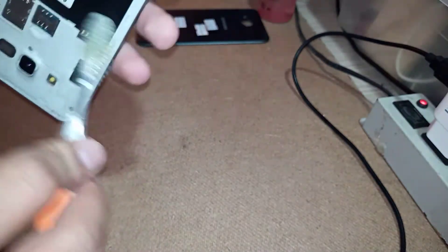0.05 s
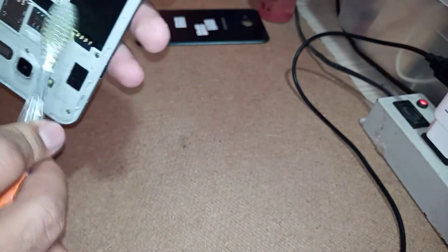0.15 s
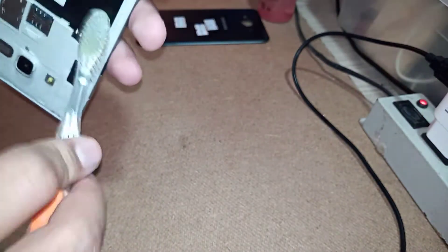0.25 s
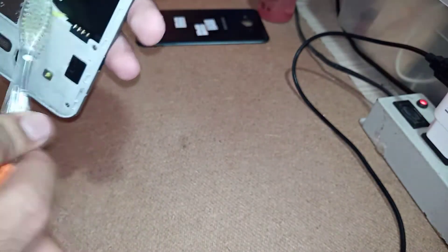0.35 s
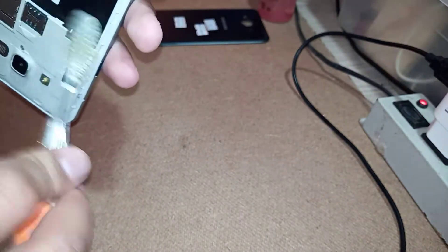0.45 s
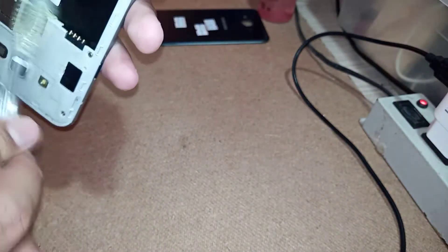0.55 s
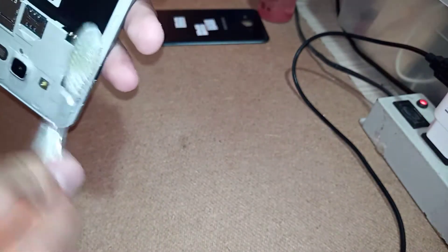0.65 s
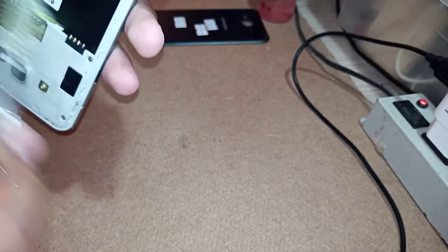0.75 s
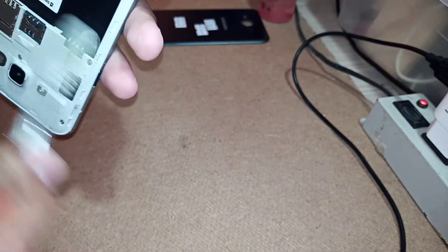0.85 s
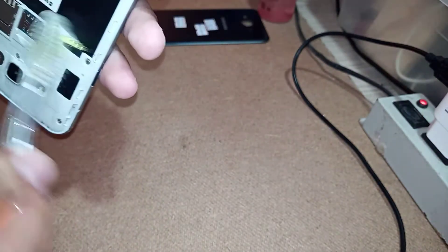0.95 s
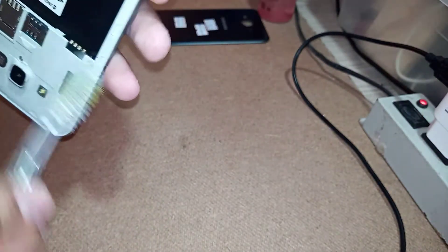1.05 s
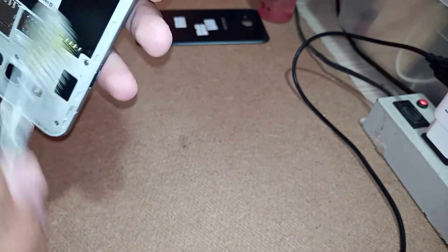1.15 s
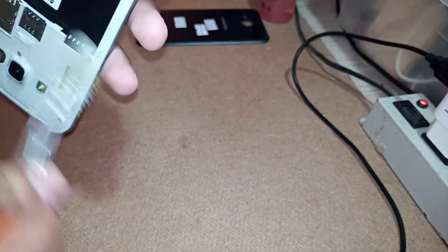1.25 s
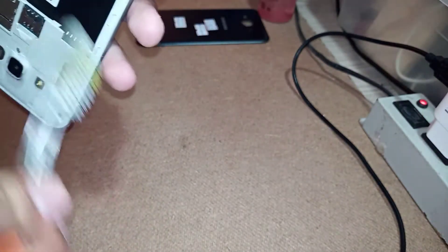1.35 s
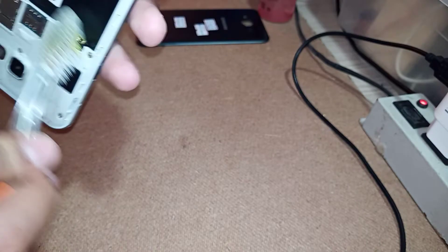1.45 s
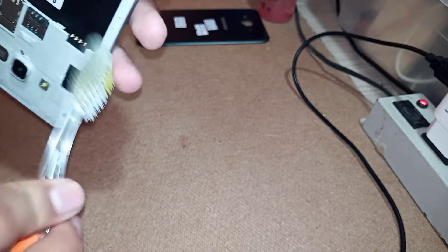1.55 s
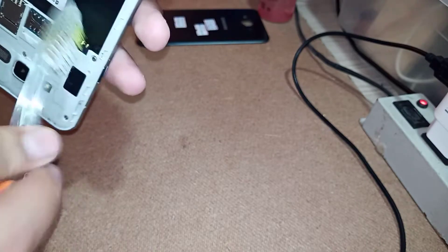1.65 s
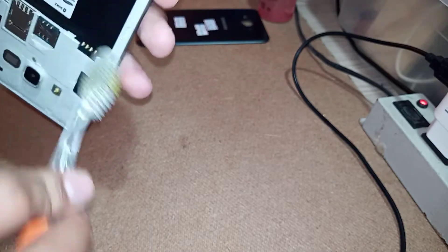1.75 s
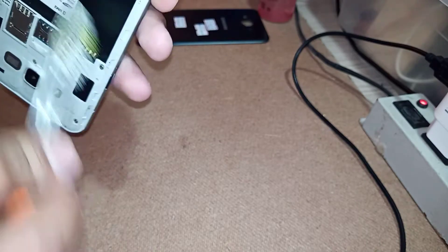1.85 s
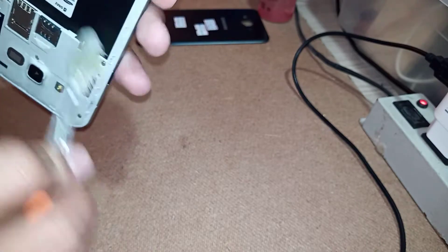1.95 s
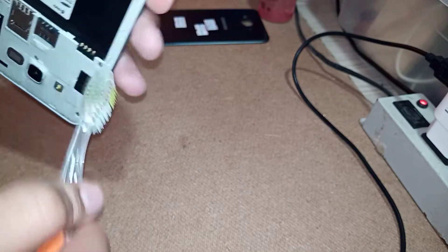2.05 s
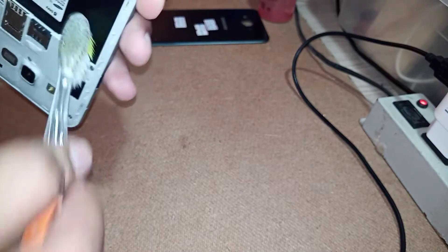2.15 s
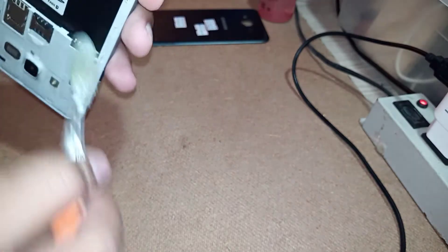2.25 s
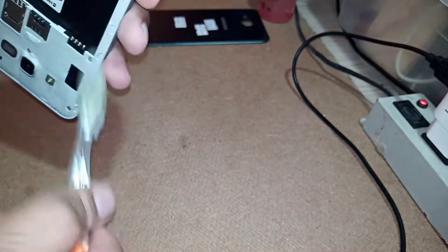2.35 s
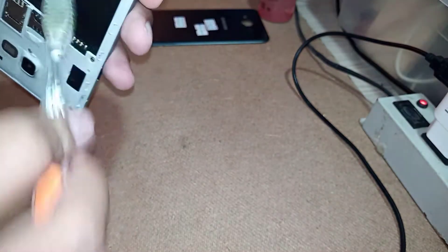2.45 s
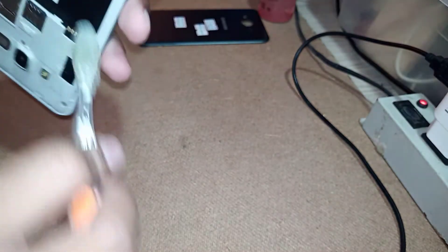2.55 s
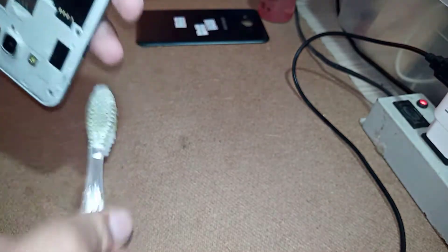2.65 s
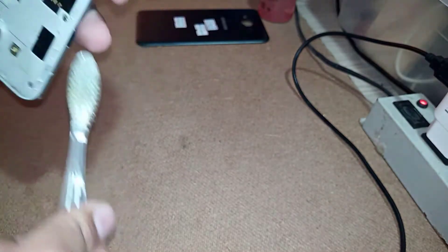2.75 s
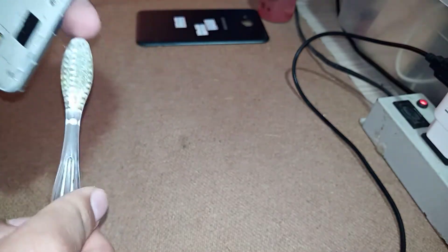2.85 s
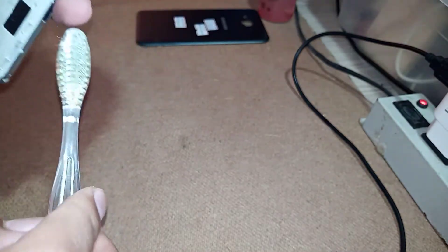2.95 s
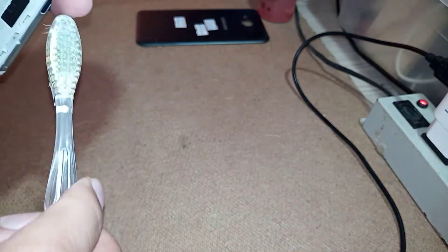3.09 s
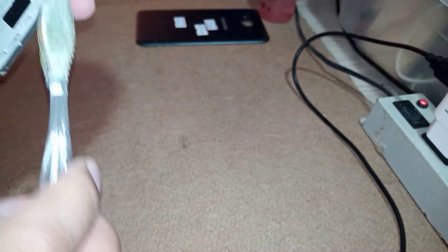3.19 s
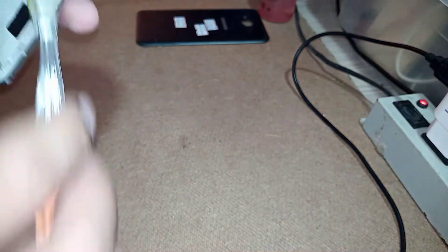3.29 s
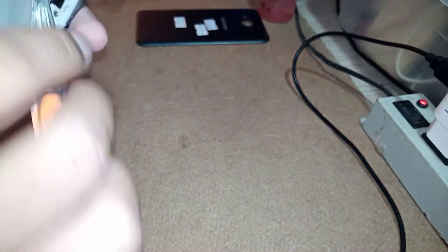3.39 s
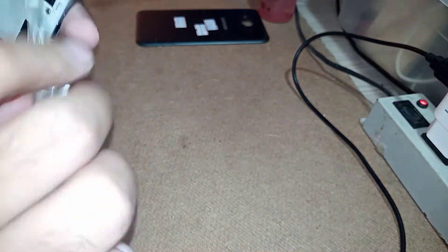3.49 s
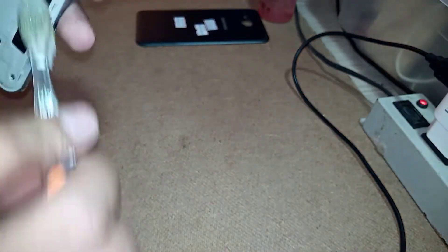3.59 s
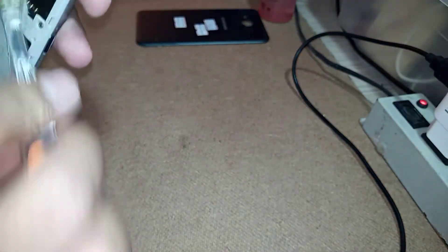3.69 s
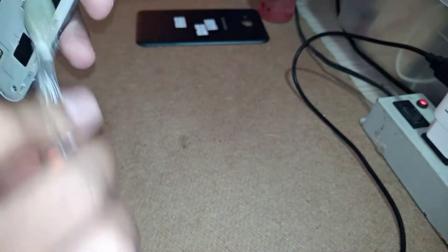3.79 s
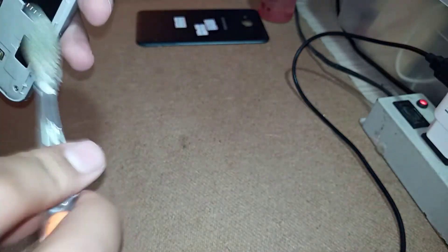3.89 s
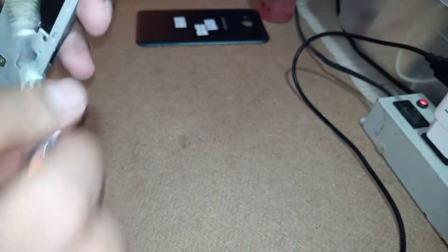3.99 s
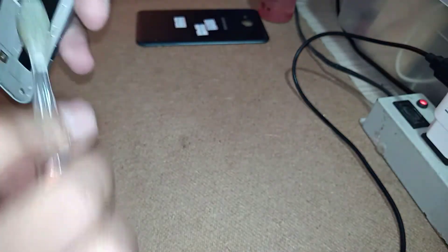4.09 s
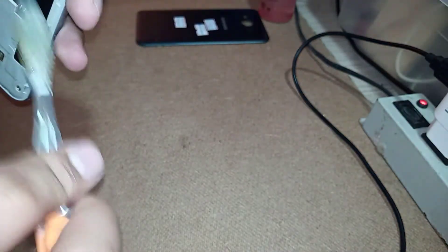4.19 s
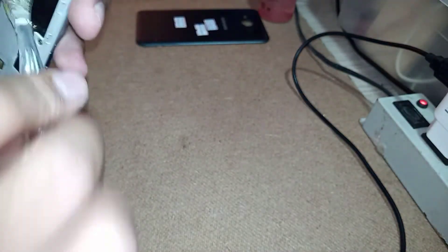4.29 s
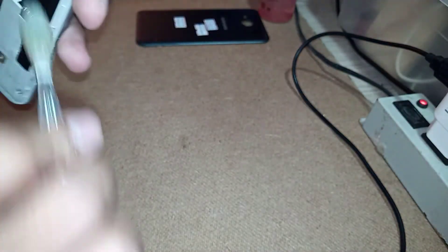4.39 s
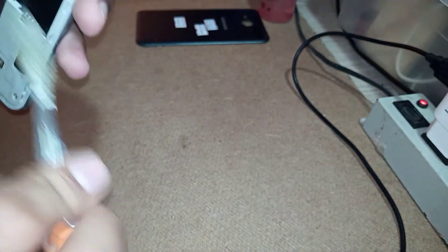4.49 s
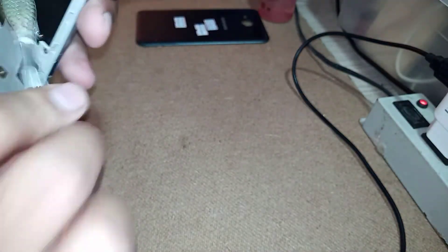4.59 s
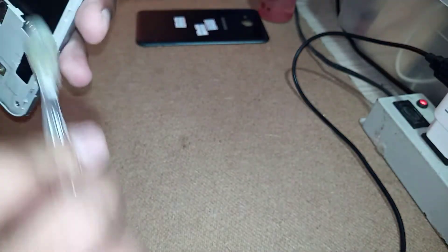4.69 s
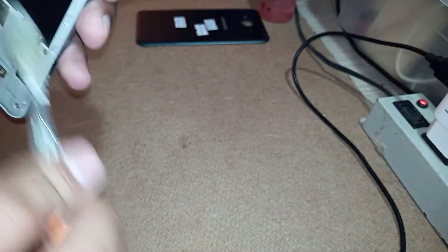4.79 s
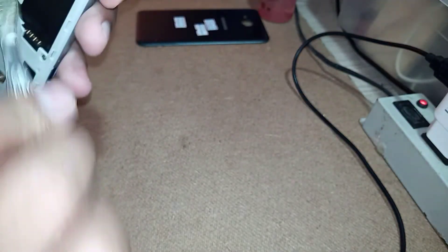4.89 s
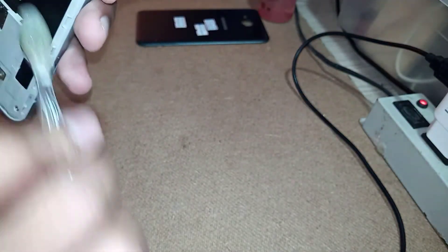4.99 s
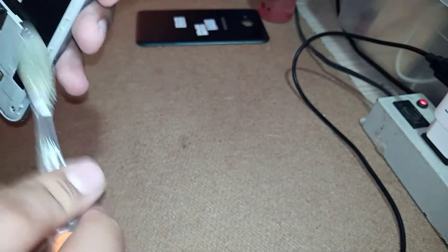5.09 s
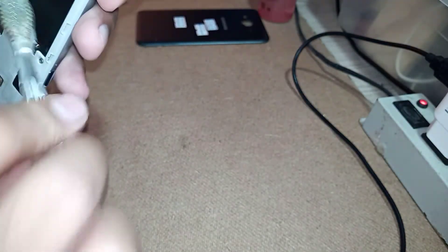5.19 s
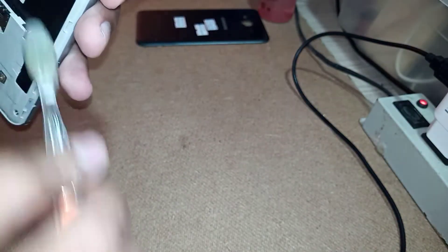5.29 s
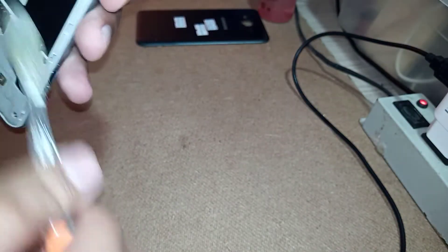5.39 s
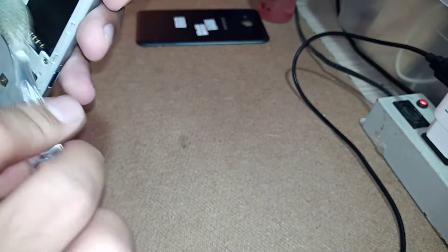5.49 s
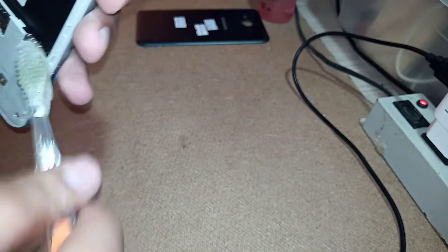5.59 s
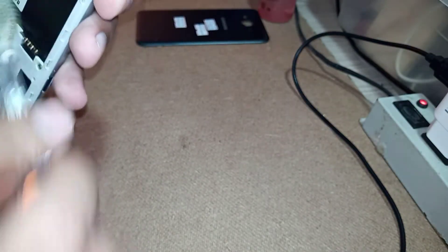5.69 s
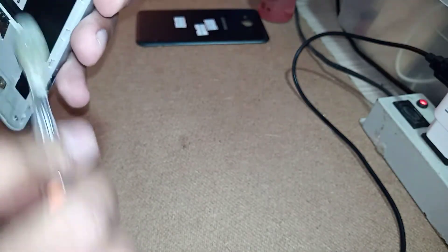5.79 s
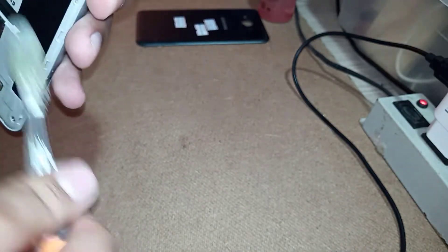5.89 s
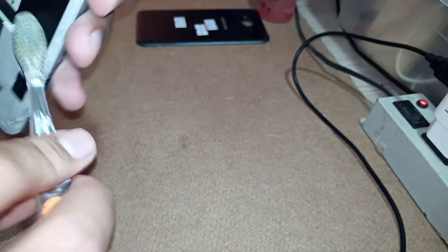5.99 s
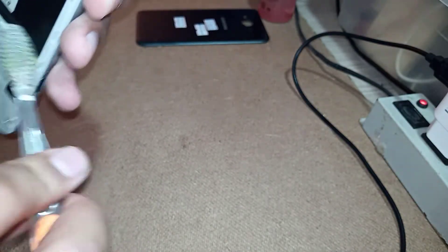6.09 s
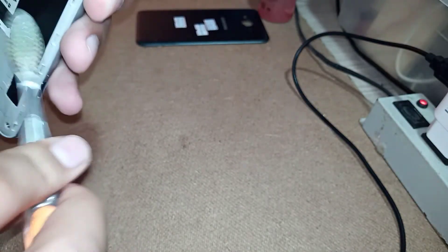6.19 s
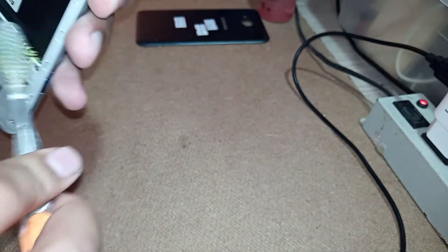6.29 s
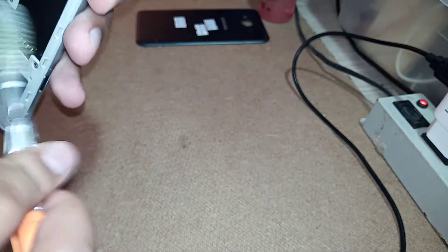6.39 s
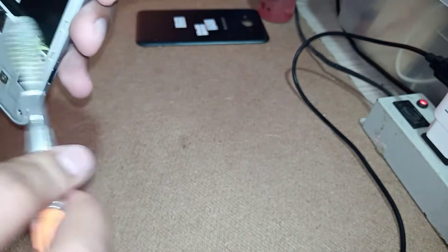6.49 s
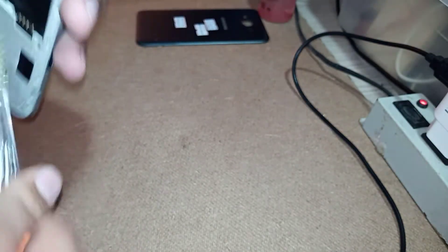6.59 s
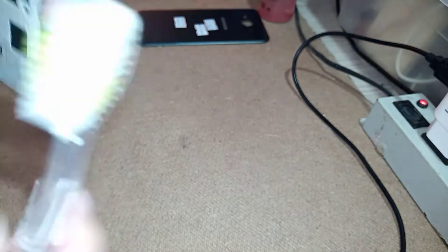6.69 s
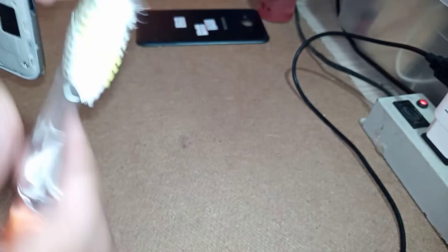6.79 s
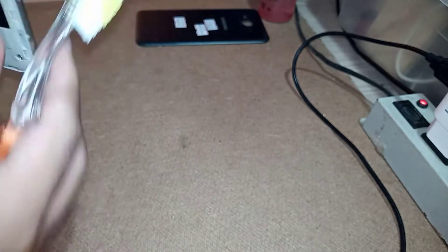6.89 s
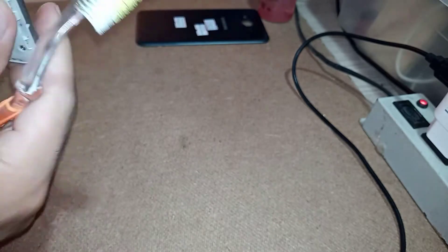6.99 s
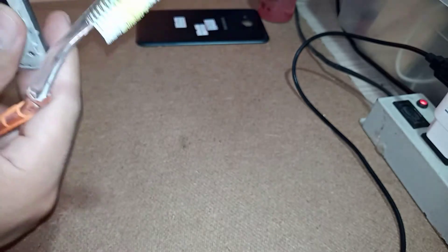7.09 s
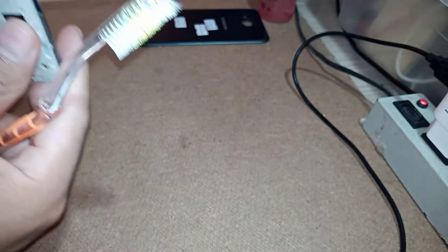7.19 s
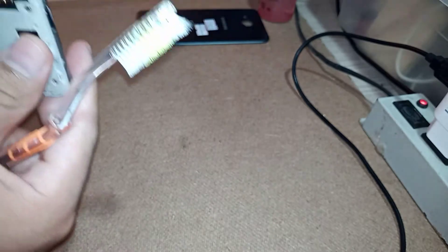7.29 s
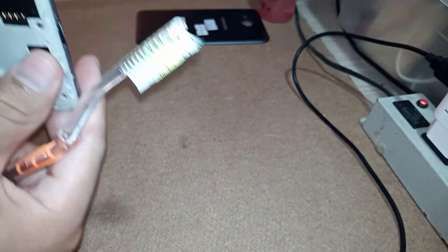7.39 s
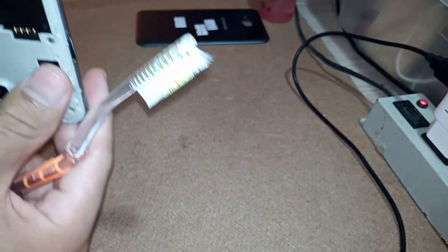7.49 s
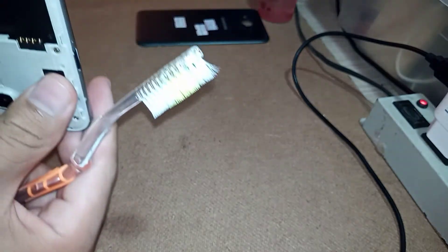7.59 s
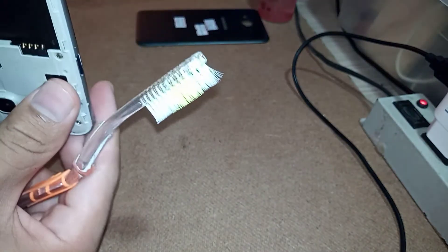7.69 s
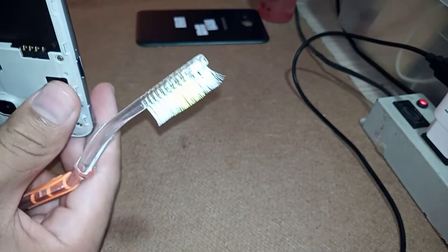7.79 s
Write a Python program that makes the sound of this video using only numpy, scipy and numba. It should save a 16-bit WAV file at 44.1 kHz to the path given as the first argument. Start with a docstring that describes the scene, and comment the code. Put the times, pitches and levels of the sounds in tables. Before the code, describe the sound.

Fast bristly scratching on thin plastic and metal, with short hard double-click knocks and brief pauses, over faint street rumble and thin hiss.

```python
"""Toothbrush inside an open phone

A toothbrush scrubs the open inside of a hand-held phone, heard close up in a small hard room.
Random bristle slips make the hiss and flicks, and ring resonances of the parts and the shell.
The brush head knocks the frame in double strikes; fingers scrape the shell, a low band of noise.
A far engine hums as a few sine waves, with dull street rumble and a thin hiss made of noise.
Short patches of the treble differ between left and right; all else is the same on both sides.
"""
import sys
import numpy as np
from scipy import signal
from scipy.fft import rfft, irfft, next_fast_len
from scipy.io import wavfile
from scipy.ndimage import uniform_filter1d
from numba import njit

SR = 44100
rng = np.random.default_rng(int(sys.argv[2]) if len(sys.argv) > 2 else 0)


def ratio(d):
    """dB to gain"""
    e = np.asarray(d, float) / 20
    return 10 ** e


def wav_record(signal):
    """Record a signal, one row per channel, as 16-bit PCM in the file named by sys.argv[1]."""
    frames = np.transpose(np.atleast_2d(signal))
    bounded = np.clip(frames, -1, 1)
    # unit amplitude maps onto the largest positive 16-bit level
    quanta = np.round(bounded * 32767).astype(np.int16)
    wavfile.write(sys.argv[1], SR, quanta)


N = 346171
TIME = np.arange(N) / SR

# brush strokes: (lift-off t/s, landing before lift-off t/s, fastest moment before lift-off t/s,
# small parts relative level/dB, fall from fastest to lift-off level/dB,
# then relative to the small parts: tips level/dB, bodies level/dB, shield can level/dB, cover level/dB)
STROKES = [(.045, 0.14, 0.021, -53, 12, 4.5, 4, 5, -23), (0.164, 0.082, 0.036, -41, 8.5, -0.5, -17, 2, 3.5),
           (0.258, 0.068, 0.036, -37.5, 17, -2, -5, 3, 0),
           (0.387, 0.095, 0.034, -39, 13.5, -0.5, -16.5, 3.5, 4),
           (.485, 0.078, 0.043, -42, 8, 1, -24, 2, 3), (0.598, 0.091, 0.04, -39, 14, 0.5, -6.5, 3, 4),
           (0.689, 0.068, 0.026, -39.5, 6.5, 2, -27, 4, 2), (.815, 0.081, 0.059, -39, 18, 1, -17, 4.5, 7),
           (0.918, 0.081, 0.047, -38.5, 7, 0, -11, 0, 1),
           (1.015, 0.06, 0.025, -35.5, 11.5, -0.5, -30, 2.5, -2),
           (1.091, 0.065, .037, -36, 13.5, -1, -16, 4.5, 3),
           (1.326, 0.099, 0.046, -38, 13.5, 1.5, -5, 2, -6.5),
           (1.585, 0.11, 0.076, -41, 17, 4.5, -5.5, 3.5, -1),
           (1.825, 0.11, 0.067, -42.5, 16.5, 3.5, -3.5, 3.5, -9.5),
           (2.077, 0.13, 0.076, -41, 11, -0.5, 1.5, 3, -3),
           (2.319, 0.13, 0.055, -44.5, 2.5, 2, -2.5, 1.5, -5),
           (2.613, 0.1, 0.058, -40, 6, -0.5, 1.5, 2.5, -5.5), (3.15, 0.51, 0.4, -79, 0.5, -2, -8, 5.5, -5),
           (3.625, 0.16, 0.065, -44.5, 12.5, 3, -1, -0.5, -3),
           (3.916, 0.14, 0.083, -44, 14, 5.5, -7.5, 0, -2),
           (4.196, 0.14, 0.08, -42, 9.5, -0.5, -4, 1.5, -3),
           (4.469, 0.11, 0.03, -39, 9.5, 1.5, -2.5, 4.5, -6.5),
           (4.782, 0.13, 0.072, -43.5, 6, 2, 2.5, 2, -3),
           (5.098, 0.16, 0.097, -43.5, 16.5, 3.5, -21, 1, 8.5),
           (5.379, 0.17, 0.079, -45.5, 15.5, 7, -3, 4, 3), (5.644, 0.12, 0.079, -39.5, 20, 2, -13, 4, 2),
           (5.898, 0.14, 0.082, -43, 13.5, 1.5, -19, 1.5, 1),
           (6.164, 0.17, 0.19, -48.5, 3, -3.5, -0.5, 4.5, -6), (6.352, 0.13, 0.017, -48, 9, 3, -4, 5.5, 6),
           (6.476, 0.038, 0.0053, -46, 15, 6, -7, 4, -2.5),
           (6.546, 0.068, 0.032, -49.5, 12, 9.5, -9.5, 10, 6),
           (6.805, 0.34, 0.13, -72.5, 5, -1, -20.5, 8.5, -16.5)]
# brush head on the frame: (t/s, strength level/dB, then balance within the blow:
# shell level/dB, hollow and frame level/dB, crack level/dB)
KNOCKS = [(0.213, -31, 15, 16, -17.5), (0.242, -19.5, 6.5, 13, -12), (0.28, -31.5, 14, -15, -22),
          (0.469, -19, 10, 13, -32), (0.519, -27, 16.5, 20, 0), (0.676, -14.5, 7.5, 12, -33),
          (0.902, -16.5, 8, 14, -10.5), (1.224, -25, -23.5, -3, -7.5), (1.316, -35.5, 11.5, -11, 1.5),
          (1.475, -27, -19, -2, -2.5), (1.483, -32, -8, -4.5, -12), (1.511, -29, -11.5, -1, 1),
          (1.579, -41.5, 8.5, -4, -10), (1.704, -32.5, -9, -5.5, 1), (1.711, -27, -14.5, -5, -25),
          (1.809, -39, 13, -3.5, -5), (1.944, -12, 10, 10, -8.5), (2.188, -12.5, 10.5, -16.5, -23.5),
          (2.315, -35, 18, -8, -10), (2.365, -43, -9.5, -9, 9.5), (2.4, -50.5, -14.5, -11.5, 4.5),
          (2.441, -47.5, 0, -13, -4.5), (2.504, -10, 7.5, 5, -25.5), (2.604, -31, -15, -7, -1),
          (3.469, -14, 3, 6, -18), (3.754, -25, -9.5, -5, -12), (3.76, -30, -16, 7.5, -14.5),
          (3.786, -32, -4, 11.5, -19), (3.905, -54, -15.5, -13.5, 11), (4.05, -10, 0.5, 6.5, -14),
          (4.33, -11, 6, 13, -10.5), (4.383, -24.5, 4.5, 6, -28.5), (4.388, -31, 0, 8, -21),
          (4.616, -48, 17, 16, -15.5), (4.649, -14.5, 10, 12.5, -19), (4.952, -14, 8, 12.5, -41),
          (4.975, -17, 4.5, 9, -27), (5.227, -30, 6, 4.5, -8), (5.233, -21, 9.5, 12, -24),
          (5.49, -32.5, -17.5, 4, -19), (5.496, -23.5, -27, 0.5, -4.5), (5.541, -35, -10, 1.5, -14.5),
          (5.602, -38.5, -21.5, -15.5, -12.5), (5.753, -51, -17.5, 0, 2.5), (5.757, -27, -14, 7, -11),
          (5.954, -56, -6, 4.5, 0), (5.995, -10, 0, 7, -5), (6.236, -15.5, 19.5, 17, -11),
          (6.428, -12, 11.5, 14, -43), (6.442, -25, 14, 18, -11), (6.517, -29.5, -20, -15, -18),
          (6.532, -29, -19, -1, 1)]

# what the phone rings with, before damping: (f/Hz, width f/Hz, relative level/dB)
PARTS = [(3657, 670, 1), (5745, 600, 4), (6750, 1100, 1.5), (7900, 1700, -6)]    # small parts
CAN = [(4820, 980, 3.3)]        # metal shield can
COVER = [(2320, 650, -4)]    # plastic cover
FRAME = [(2477, 190, -2.5), (3287, 480, 1.5)]
HOLLOW = [(1777, 400, -4), (2130, 230, -3)]
SHELL = [(466, 74, -6), (720, 190, -14.5), (1022, 200, -2.5), (1570, 430, -5.5)]
# colour of the bristle tips: (f/Hz, relative level per Hz/dB)
BRISTLES = [(4710, -13.5), (8000, -2), (9980, -9.5), (12800, 1.5), (15200, 2), (16200, -29), (16400, -17),
            (16500, -51.5)]
# narrow band that lingers after some blows: (t/s, f/Hz, level before it fades/dB)
LINGER = [(2.189, 1820, -51.5), (2.506, 1765, -42), (3.469, 1800, -45.5), (4.049, 1840, -44),
          (4.33, 1880, -38), (6.001, 1783, -46)]
# fingers rub and shift on the shell: (t/s, relative level/dB)
GRIP = [(0.0, -80), (1.75, -64.5), (2.17, -60.5), (2.3, -75), (3.11, -85), (3.42, -87.5), (3.71, -68),
        (3.86, -70.5), (4.69, -73), (4.88, -61), (5.17, -70), (5.3, -80), (5.57, -78.5), (5.71, -65),
        (6.28, -69), (6.44, -78), (6.75, -84), (6.9, -83)]
# pitch range of that scrape: (f/Hz, width f/Hz, relative level/dB)
GRIP_BAND = [(464, 210, 0)]
# echo of the room: (f/Hz, time to fall 60 dB t/s, relative level/dB)
ROOM = [(437, 0.48, -35.5), (1060, 0.65, -38.5), (1708, 0.66, -32), (3300, 0.78, -29), (6400, 0.7, -25),
        (12980, 0.47, -17)]
# far engine, swelling and fading: (t/s, relative level/dB)
ENGINE = [(1.7, -89), (1.85, -73.5), (2.13, -82), (2.24, -66), (2.62, -71.5), (2.85, -85), (3.35, -95.5),
          (3.51, -73), (3.72, -76), (3.89, -95), (4.13, -75), (4.33, -89), (4.45, -100)]
# tones of the engine: (multiple of the shaft rate, relative level/dB)
ENGINE_ORDERS = [(2, 2.5), (3, -13.5), (4, -16.5), (5, -3)]
# colour of the thin hiss: (f/Hz, relative level per Hz/dB)
HISS = [(30, -22), (70, -26), (130, -10), (250, -4), (450, 0), (700, -1), (1100, -3), (2000, -10),
        (3200, -12), (4800, -7), (6500, -6), (8000, -13), (9800, -24), (12500, -15), (15300, -10)]
# street noise through the wall: (t/s, relative level/dB)
STREET = [(0.0, -66.5), (1.2, -67.5), (2.47, -65), (3.0, -76.5), (3.2, -79), (3.4, -78.5), (4.5, -74.5),
          (5.6, -83), (6.2, -77.5), (6.8, -93), (7.85, -77.5)]
# how often the treble differs between the ears: (f/Hz, share of moments)
SPREAD = [(4500, .15), (5500, .1), (6500, .15), (7600, 0.078), (8800, 0.62), (10200, 0.31), (11600, 0.28),
          (13000, 0.16), (14500, 0.18)]

# relative levels of the parts in the scrub
PARTS_DB, FRAME_DB, HOLLOW_DB, SHELL_DB, PLAIN_DB = 3.5, 2.5, 5, 3, -1.5
# how far the scrub sits under its top as a stroke starts, and how pointed the swell is
START_DROP_DB, TIPS_START_DROP_DB, SWELL_POWER = 15, 22.5, 1.8
# tufts press hardest just after landing: the bodies come in quickly, then ease off
PRESS_ATTACK_S, PRESS_EASE_DB_S = 0.0022, 59.5
# how fast the scrub and the bodies die at lift-off
LIFT_DB_S, BODY_LIFT_DB_S = 1202.5, 398
# the shell keeps murmuring in the hand after the tufts leave
SHELL_EASE_DB_S, SHELL_LIFT_DB_S = 35, 77.5
# pitches shift with grip and place of contact (share of pitch)
SCRUB_SHIFT, KNOCK_SHIFT = 0.044, 0.015
# tufts and blows damp what they ring: resonances are this many times wider
TUFT_DAMPING, KNOCK_DAMPING = 1.597, 1.02
# double strike: first delay, usual gap, usual level of the second against the first
STRIKE_DELAY_S, STRIKE_GAP_S, SECOND_DB = 0.0012, 0.00135, -0.5
# rattle around the strikes: delay, and length and level for a blow of the given strength
RATTLE_DELAY_S = 0.0008
RATTLE_S, RATTLE_S_AT_DB = 0.0013, -13.5
RATTLE_DB, RATTLE_DB_AT_DB = -8.5, -8.5
KNOCK_FRAME_DB = -1.5
LINGER_WIDTH_HZ, LINGER_ATTACK_S, LINGER_T60_S = 235, 0.0076, 0.68
GRIP_LUMPS_DB = 8
# the engine's second order climbs steadily, then holds
ENGINE_START_HZ, CLIMB_HZ_PER_S, ENGINE_TOP_HZ = 108.5, 8.6, 126.5
HISS_DB = -70  # before a slow random sway


def scrub():
    """Slips drive the tips and the bodies under them; each resonance wavers as tufts cross ribs and holes."""
    parts, tips, bodies, shell, can, cover = stroke_gains()
    tufts = walk(60)
    hiss = level(colour(slips(3000, 2.0, 2.5), BRISTLES), 0)
    out = tips * hiss * ratio(1.7 * tufts)
    drive = slips(2600, 2.6, 2) * ratio(1.5 * tufts)
    bodies_rung = ((parts, PARTS, PARTS_DB), (can, CAN, PARTS_DB), (cover, COVER, PARTS_DB),
                   (bodies, FRAME, FRAME_DB), (bodies, HOLLOW, HOLLOW_DB), (shell, SHELL, SHELL_DB))
    for gain, modes, db in bodies_rung:
        for hz, width, mode_db in modes:
            push = drive * gain * ratio(db + mode_db + 2.5 * walk(25))
            moving_hz = hz * (1 + SCRUB_SHIFT * walk(9))
            out += sway(push + 1e-18, moving_hz, TUFT_DAMPING * width)
    # the slips are also heard plainly, in one wide band
    plain = drive * np.sqrt(parts * bodies) * ratio(PLAIN_DB)
    return out + ring_twice(plain, 2480, 1600)


def stroke_gains():
    """Gains of small parts, bristle tips, bodies, shell, can and cover over all strokes."""
    gains = np.zeros((6, N))
    for end, length, slowing, db, end_db, tips_db, body_db, can_db, cover_db in STROKES:
        start = end - length
        top = end - min(slowing, 0.9 * length)  # never right at the landing
        span = slice(max(int((start - 0.1) * SR), 0), int((end + 0.6) * SR))
        t = TIME[span]
        age, after = np.maximum(t - start, 0), np.maximum(t - end, 0)
        press = ratio(db + body_db) * (1 - np.exp(-age / PRESS_ATTACK_S))
        parts = ratio(db + swell(t, start, top, end, START_DROP_DB, end_db))
        tips = ratio(db + tips_db + swell(t, start, top, end, TIPS_START_DROP_DB, end_db))
        bodies = press * ratio(-PRESS_EASE_DB_S * age - BODY_LIFT_DB_S * after)
        shell = press * ratio(-SHELL_EASE_DB_S * age - SHELL_LIFT_DB_S * after)
        gains[:, span] += [parts, tips, bodies, shell, parts * ratio(can_db), parts * ratio(cover_db)]
    return gains


def swell(t, start, top, end, start_db, end_db):
    """A stroke speeds up and slows down (dB under its top); then the tufts lift off at once."""
    rise = start_db * np.maximum((top - t) / (top - start), 0) ** SWELL_POWER
    fall = end_db * np.clip((t - top) / (end - top), 0, 1) ** SWELL_POWER
    return -rise - fall - LIFT_DB_S * np.maximum(t - end, 0)


def slips(rate, scatter_db, rub_db):
    """Bristle tips catch and let go at random, a few much harder, over a fine rub."""
    size_db = scatter_db * np.minimum(rng.exponential(size=N), 4)
    happens = rng.random(N) < rate / SR  # rate: slips per second
    flicks = happens * rng.standard_normal(N) * ratio(size_db)
    return level(flicks, 0) + level(rng.standard_normal(N), rub_db)


def knocks():
    """Each blow is a double strike in a short rattle with a weaker bounce, ringing parts, can, shell and frame."""
    size = 4096
    out = np.zeros(N + size)
    for s, peak_db, shell_db, hollow_db, crack_db in KNOCKS:
        force = blow_force(peak_db, size)
        blow = 0
        # each blow lands elsewhere and favours other resonances
        for modes, db in ((PARTS + CAN, 0), (SHELL, shell_db), (HOLLOW, hollow_db),
                          (FRAME, hollow_db + KNOCK_FRAME_DB)):
            for j, (hz, width, mode_db) in enumerate(modes):
                shifted_hz = hz * (1 + KNOCK_SHIFT * rng.standard_normal())
                rung = ring(force, shifted_hz, KNOCK_DAMPING * width)
                # each resonance takes its own share of the blow's energy
                share = np.sqrt(np.sum(force ** 2) * np.pi * width / SR / np.sum(rung ** 2))
                gain = ratio(db + mode_db + 1.4 * rng.standard_normal())
                blow += (-1) ** j * gain * share * rung
        # the contact itself is heard too: a wide plain band and a bright crack
        blow += ratio(-3.0 + 0.36 * shell_db) * ring_twice(force, 3020, 3200)
        blow += ratio(crack_db) * ring(force, 10500, 10500 / 1.1)
        # set the strength from the energy, counted over 5.5 ms
        strength = ratio(peak_db - 7) / np.sqrt(np.sum(blow ** 2) / (0.0055 * SR))
        i = int(s * SR)
        out[i:i + size] += blow * strength
    return out[:N]


def blow_force(peak_db, size):
    """Two sharp contacts within a noisy rattle; light blows are cushioned by the tufts and rattle longer."""
    t = np.arange(size) / SR
    rattle_s = RATTLE_S * ratio(-0.3 * (peak_db - RATTLE_S_AT_DB))
    age = np.maximum(t - RATTLE_DELAY_S, 0) / rattle_s
    contact = age ** 0.7 * np.exp(-age ** 1.323)
    contact += ratio(-15.5) * np.roll(contact, int(0.0042 * SR))  # weaker bounce
    noise = rng.standard_normal(size)
    rattle_db = RATTLE_DB - 0.31 * (peak_db - RATTLE_DB_AT_DB)
    force = ratio(rattle_db) * contact * noise * np.abs(noise) ** 1.1
    first = int(STRIKE_DELAY_S * SR)
    gap = int(STRIKE_GAP_S * SR * (1 + 0.03 * rng.standard_normal()))
    force[first] += 1
    force[first + gap] += ratio(SECOND_DB + 1.7 * rng.standard_normal())
    return force


def linger():
    """A rough narrow band near the hollow's pitch that sets in with a blow and dies slowly."""
    out, noise = 0, rng.standard_normal(N)
    for s, hz, db in LINGER:
        age = np.maximum(TIME - s, 0)
        fade = ratio(-60 * age / LINGER_T60_S) * (1 - np.exp(-age / LINGER_ATTACK_S))
        out += level(ring_twice(noise, hz, LINGER_WIDTH_HZ), db) * fade
    return out * ratio(4.4 * walk(70))


def grip():
    """A low uneven scrape of fingers on the shell: random slips in a low band."""
    hz, width, _ = GRIP_BAND[0]
    scrape = level(ring_twice(slips(900, 2.5, 0), hz, width), -6)
    return scrape * ratio(np.interp(TIME, *np.transpose(GRIP), right=-120) + GRIP_LUMPS_DB * walk(9.3))


def room(x):
    """A dense tail of noise that dies band by band, building up over the first milliseconds."""
    t = np.arange(SR) / SR
    tail = 0
    for hz, t60, db in ROOM:
        band = ring(rng.standard_normal(SR), hz, hz / 1.4)
        band *= ratio(-60 * t / t60) * (1 - np.exp(-t / 0.006))
        tail = tail + band * ratio(db) / np.sqrt(np.sum(band ** 2) * hz * 4 / SR)
    return signal.fftconvolve(x, tail)[:N]


def engine():
    """A few orders of a slowly rising shaft rate, swelling and fading."""
    climb = ENGINE_START_HZ + CLIMB_HZ_PER_S * (TIME - ENGINE[0][0])
    second_order_hz = np.minimum(climb, ENGINE_TOP_HZ)
    phase = np.pi * np.cumsum(second_order_hz) / SR  # the shaft turns at half that rate
    tone = sum(ratio(db + 1.0 * walk(10)) * np.sin(k * phase) for k, db in ENGINE_ORDERS)
    return np.sqrt(2) * tone * ratio(np.interp(TIME, *np.transpose(ENGINE), left=-120, right=-120))


def background():
    """Thin hiss and a dull, lumpy street rumble that fades: coloured noise and four low bands of noise."""
    hiss = level(colour(rng.standard_normal(N), HISS), HISS_DB) * ratio(walk(6))
    rumble = 0
    # f/Hz, width f/Hz, relative level/dB
    for hz, width, db in ((45, 43, -24.5), (146, 86, -5.5), (255, 78, -3.0), (503, 690, 0.5)):
        band = level(ring_twice(rng.standard_normal(N), hz, width), db)
        rumble = rumble + band * ratio(3.5 * walk(8))
    street_db = np.interp(TIME, *np.transpose(STREET)) + 1.2 * walk(2.8)
    return hiss + level(rumble, 1.0) * ratio(street_db)


def level(x, db):
    """Scale to an rms level."""
    return x * ratio(db) / np.sqrt(np.mean(x ** 2))


def colour(x, points):
    """Shape a sound by (f/Hz, level/dB) points."""
    hz, db = np.transpose(points)
    size = next_fast_len(len(x))
    bins_hz = np.arange(size // 2 + 1) * SR / size
    gain = ratio(np.interp(np.log(bins_hz + 1), np.log(hz), db))
    return irfft(rfft(x, size) * gain, size)[:len(x)]


def ring(x, hz, width):
    """One resonance: it passes its own pitch unchanged and weakens the rest."""
    return signal.lfilter(*signal.iirpeak(hz, hz / width, fs=SR), x)


def ring_twice(x, hz, width):
    """The same resonance applied twice, for steeper sides."""
    return ring(ring(x, hz, width), hz, width)


@njit
def sway(x, hz, width):
    """Steep band-pass (applied twice) whose centre moves."""
    y = x.copy()
    for _ in range(2):
        b, l = 0., 0.  # the filter's two memories
        for i in range(len(x)):
            g, k = np.tan(np.pi * hz[i] / SR), width / hz[i]
            v = (b + g * (y[i] - l)) / (1 + g * (g + k))
            b, l, y[i] = 2 * v - b, l + 2 * g * v, k * v
    return y


def walk(rate):
    """Random levels held 1 / rate s and smoothed twice; spread near 1."""
    k = int(SR / rate)
    steps = np.repeat(rng.standard_normal(N // k + 1), k)
    return 1.3 * uniform_filter1d(uniform_filter1d(steps, k), k)[:N]


def spread(x):
    """In short patches of the treble, left and right carry unrelated noise of the same colour."""
    hz, _, cells = signal.stft(x, SR, nperseg=1024)
    centres, shares = np.transpose(SPREAD)
    band = np.abs(hz[:, None] - centres).argmin(axis=1)
    # a patch lasts two frames
    frames = cells.shape[2]
    draws = np.repeat(rng.random((len(centres), frames // 2 + 1)), 2, axis=1)[:, :frames]
    treble = (hz[:, None] > 4100) & (hz[:, None] < 15900)
    apart = (draws < shares[:, None])[band] & treble
    # sharp blows stay in the middle
    power = np.sum(np.abs(cells[0]) ** 2, axis=0)
    apart &= power < ratio(14) * np.minimum(np.roll(power, 2), np.roll(power, -2))
    size = uniform_filter1d(np.abs(cells), size=9, axis=1) * ratio(-0.5)
    noise = size * (rng.standard_normal(cells.shape) + 1j * rng.standard_normal(cells.shape))
    return signal.istft(np.where(apart, noise, cells), SR, nperseg=1024)[1][:, :N]


def scene():
    """Brush and its echo over the background, the same in both channels."""
    # a small hand-held body radiates no bass
    no_bass = signal.butter(4, 340, "high", fs=SR, output="sos")
    brush = signal.sosfilt(no_bass, scrub() + knocks() + linger() + grip())
    return np.tile(brush + room(brush) + engine() + background(), (2, 1))


def band_limit(x):
    """A steep low-pass at the top of the band."""
    return signal.sosfilt(signal.butter(12, 17000, fs=SR, output="sos"), x)


def record(dry):
    """The top ends sharply at 16.3 kHz, and patches of the treble spread to the sides."""
    sharp_top = signal.ellip(8, 0.3, 50, 16300, fs=SR, output="sos")
    mix = spread(signal.sosfilt(sharp_top, dry))
    return band_limit(mix)


dry = scene()
out = record(dry)
wav_record(out)
```